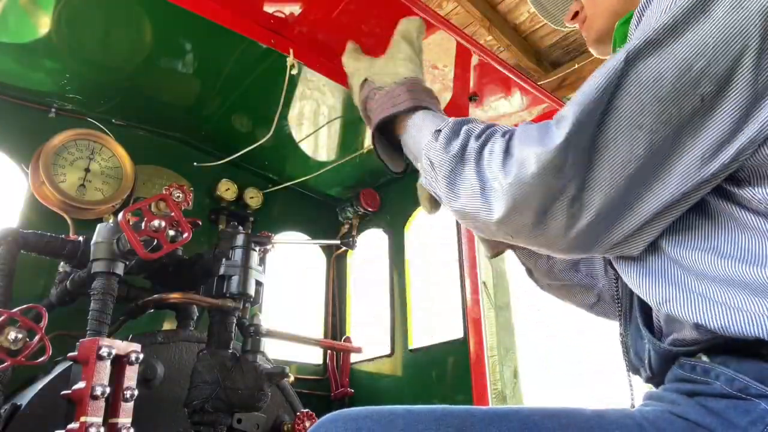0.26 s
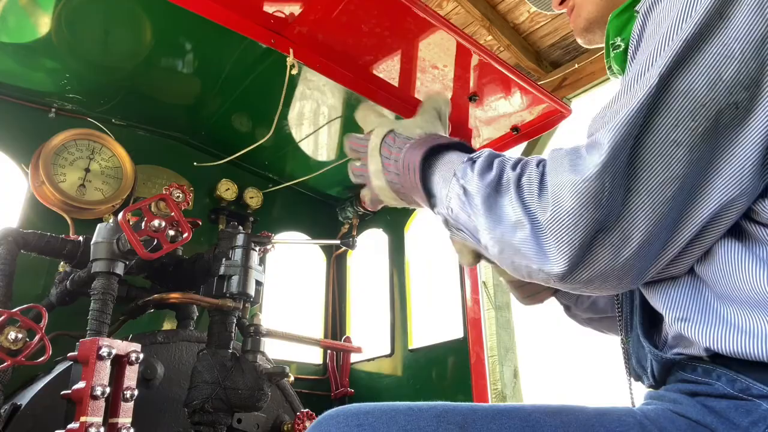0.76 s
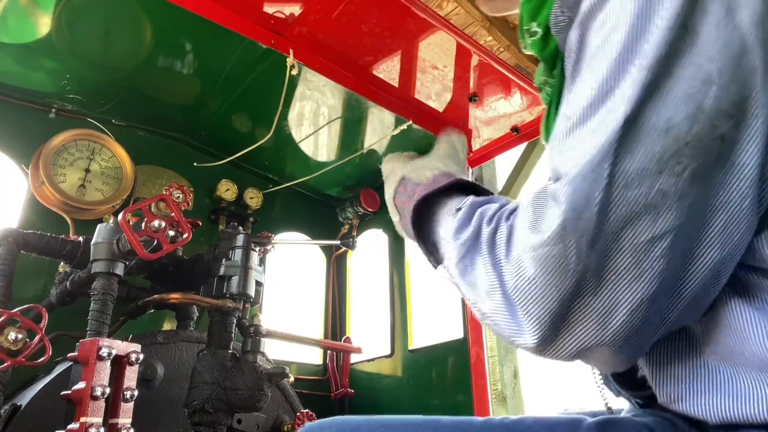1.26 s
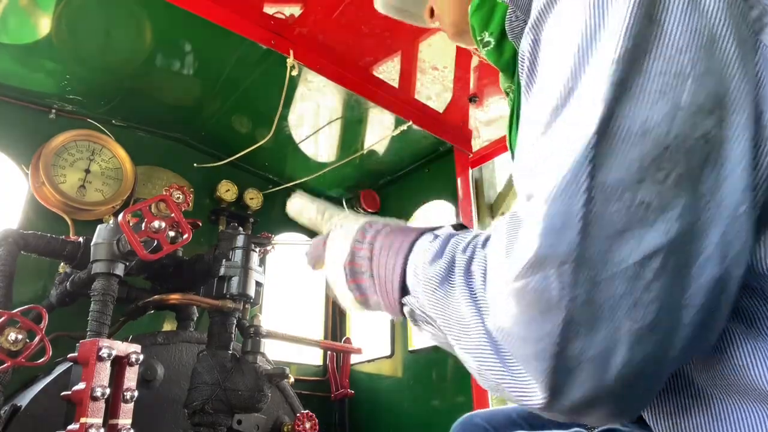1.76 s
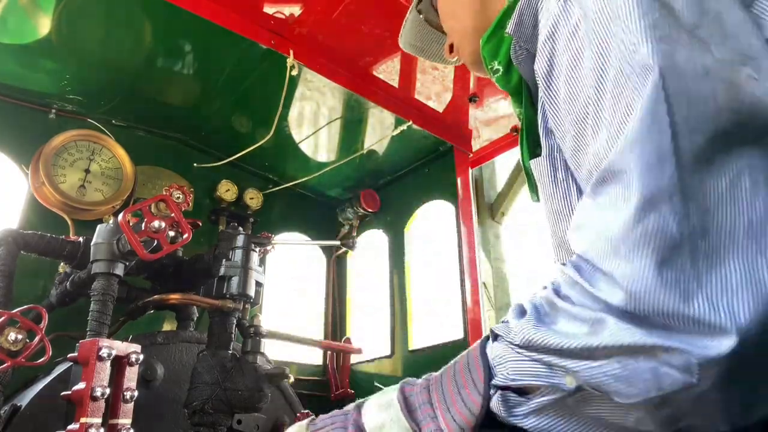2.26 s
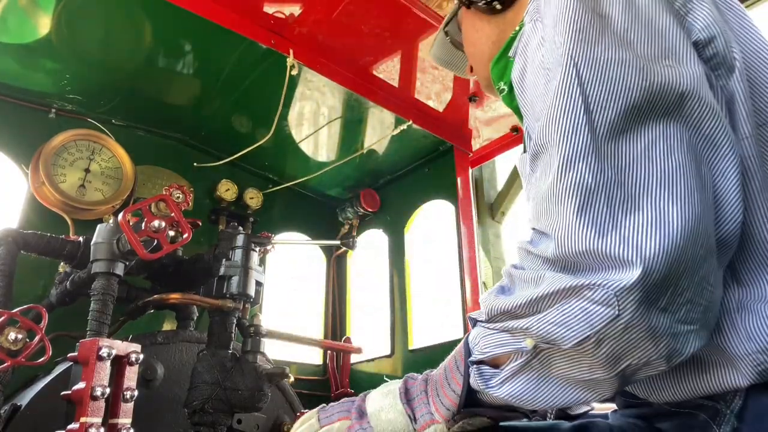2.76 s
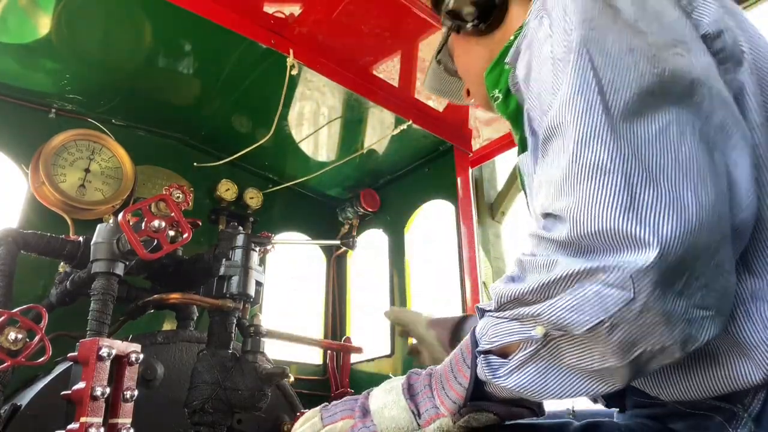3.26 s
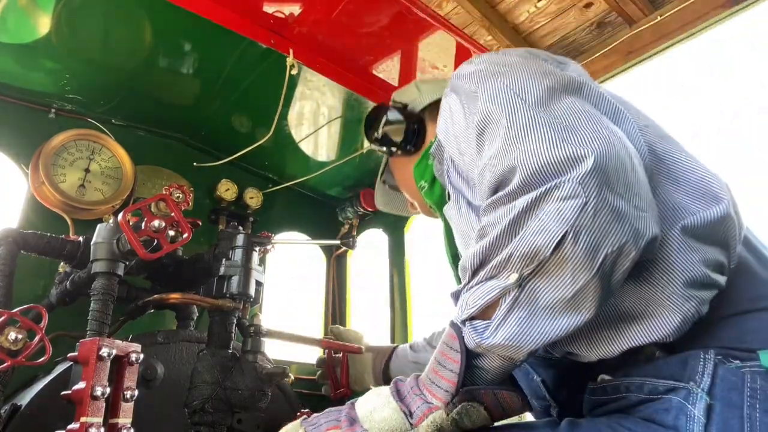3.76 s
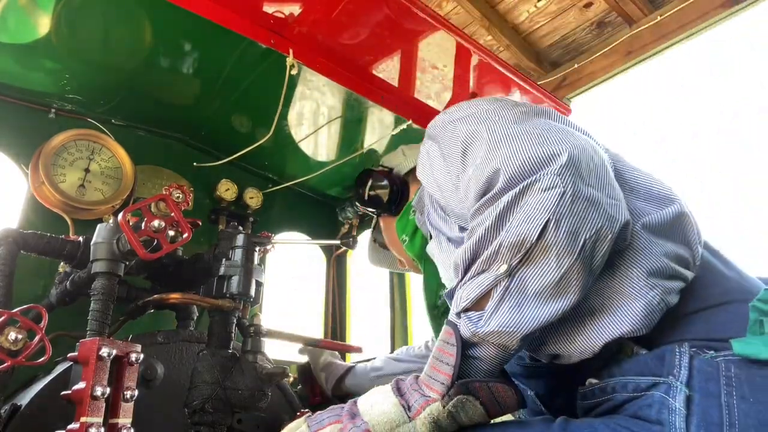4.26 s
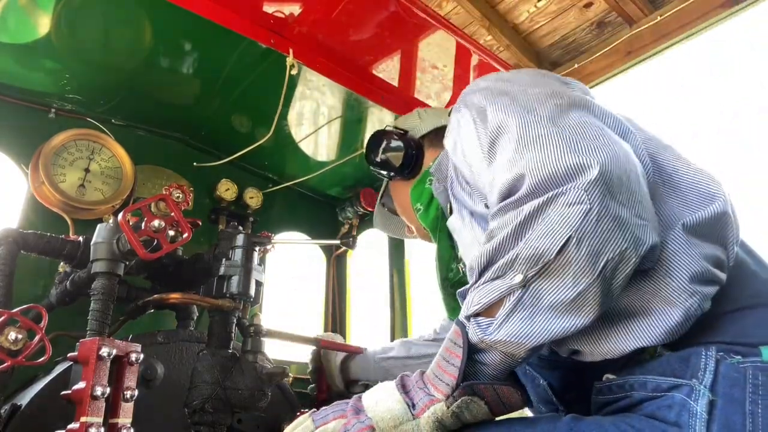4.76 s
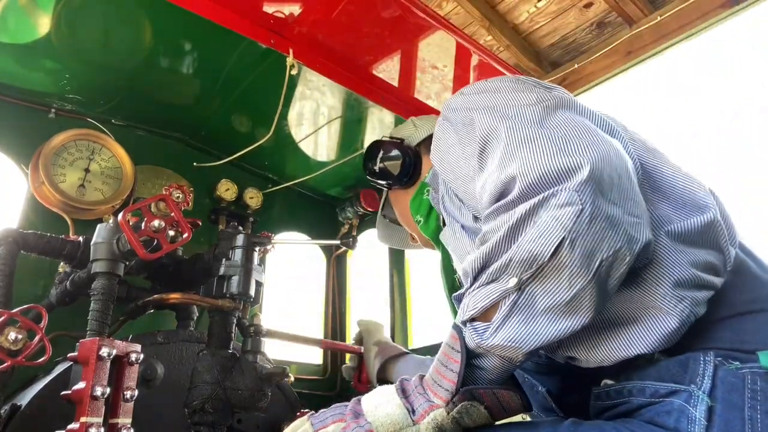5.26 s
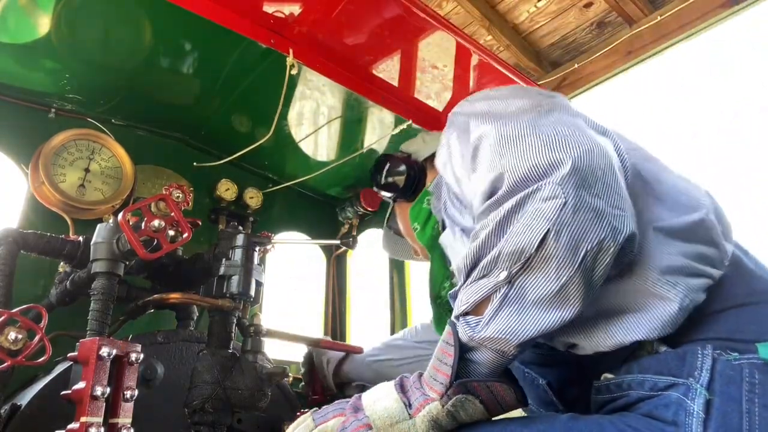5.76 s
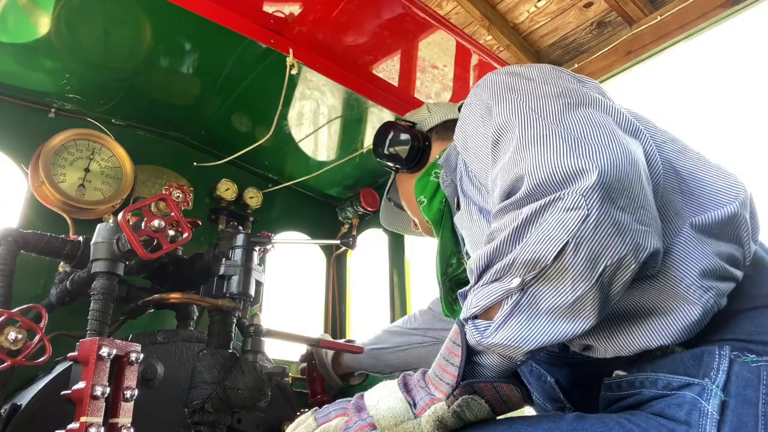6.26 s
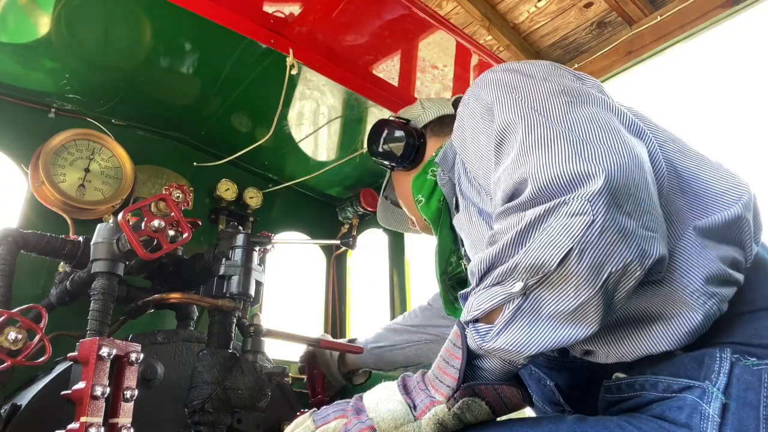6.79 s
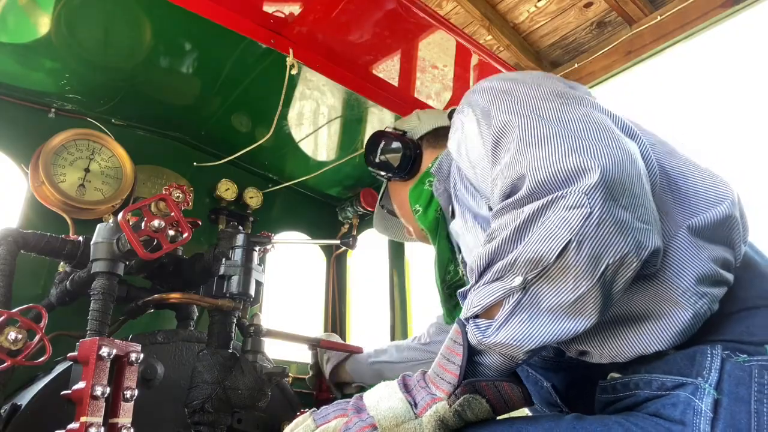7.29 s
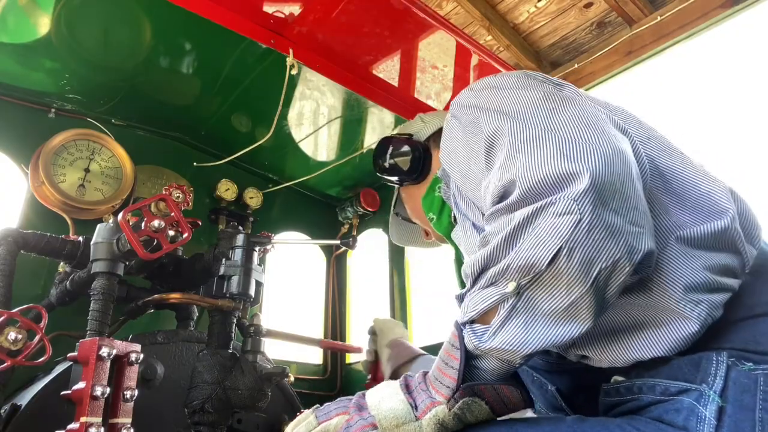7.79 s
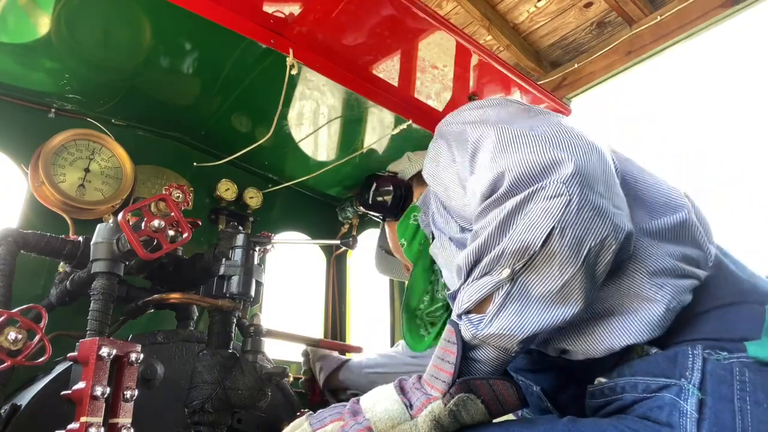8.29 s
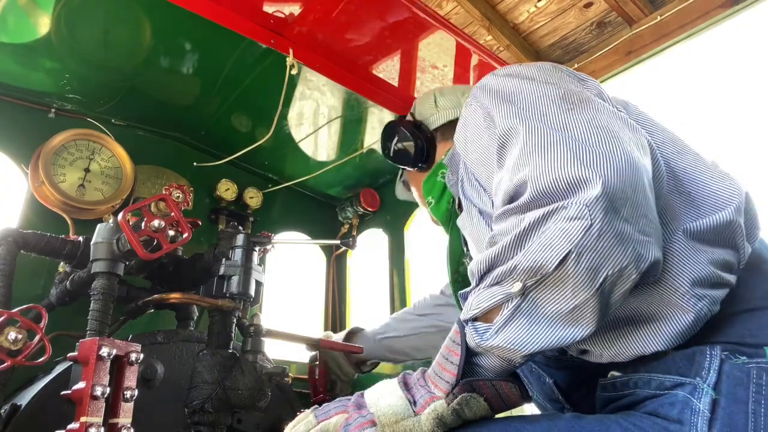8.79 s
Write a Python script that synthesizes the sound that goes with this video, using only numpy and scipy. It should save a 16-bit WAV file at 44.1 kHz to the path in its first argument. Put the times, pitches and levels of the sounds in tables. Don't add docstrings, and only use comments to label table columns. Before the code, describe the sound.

An oil fire roars and flutters in a small steam locomotive cab, with steady steam hiss and a few short metallic handle knocks.

```python
import sys
import numpy as np
from scipy import signal
from scipy.fft import rfft, irfft, next_fast_len
from scipy.io import wavfile
from scipy.ndimage import uniform_filter1d, map_coordinates

SR = 44100
rng = np.random.default_rng(int(sys.argv[2]) if len(sys.argv) > 2 else 0)


def field_ratio(decibels):
    return 10 ** (np.asarray(decibels, dtype=float) / 20)


def generate_wav(signal):
    frames = np.transpose(np.atleast_2d(signal))
    scaled = np.clip(frames, -1, 1) * 32767
    pcm = np.round(scaled).astype(np.int16)
    wavfile.write(sys.argv[1], SR, pcm)


N = 398663

# (pitch [Hz], width [Hz], left level [dB], right level [dB])
CAB_MODES = [(364.6, 85, -6, -2), (384.6, 30.6, 1, 3), (464.2, 25.5, -6, 4), (503.4, 14.2, 4, 11),
             (566.6, 28, -12, 0), (596, 290, -19.5, -14), (680, 25, -10.5, -13.5), (726, 35, -5.5, -8.5),
             (801, 45, -12, -2), (873.4, 29, -6.5, -16), (896, 67, -17, -13), (990, 49, -7.5, -9.5),
             (1067, 37, -10, -13), (1138, 35, -8.5, -8), (1223, 16.6, -7.5, -16), (1398, 96, -14, -18),
             (1546, 35, -12.5, -19), (1703, 112, -13, -21), (1837, 58, -15.5, -28),
             (1980, 105, -24.5, -21.5), (2142, 150, -19.5, -25.5), (2598, 100, -20.5, -24),
             (2734, 54, -14.5, -22.5), (3006, 620, -19.5, -24), (3390, 57, -18.5, -18.5),
             (3990, 23, -26.5, -24), (4340, 370, -27, -30.5), (4880, 37, -22.5, -38),
             (5625, 43, -25.5, -20), (5970, 110, -25, -35.5)]
PORT_PHASES = (0, -.1, -.4, .5, -1.1, 0, -1.8, -1.8, -2.1, 1.5, -3, -3, -2.3, -2.5, -2.6, -2, -2.5, -2.2,
               .7, .5, -1.7, -.2, -.7, -1.5, -2, -.4, -.1, 1.2, -1.6, -1)
# (pitch [Hz], width [Hz], level [dB], left minus right [dB])
PLATE_MODES = [(537, 210, 3, 0), (750, 78, 4, -10.5), (1160, 400, -7.5, 8), (1480, 220, -0.5, 4),
               (1810, 240, -0.5, 7.5), (2140, 200, -10, -10), (2670, 170, -9, -11.5), (3630, 340, -5.5, 5),
               (4640, 900, -15, 5), (6070, 550, -15.5, 4.5), (7240, 1400, -16, -2), (8850, 1600, -22, -2),
               (13300, 1900, -42, 10)]
# (time [s], peak [dB], thump [dB], brightness [dB per octave], top-octave level [dB])
KNOCKS = [(.851, -33, -14, 3, 8), (3.869, -29, -3, 2.5, -8), (4.264, -20.5, -9, 1, -10),
          (4.666, -26, -15, 5, 6), (4.965, -30, -6, 1, -10), (5.525, -27, 6, 2, 3), (5.559, -24, 1, 0, -15),
          (5.584, -24, 6.5, -0.5, -15), (5.6, -29.5, 8, -2, -15), (5.809, -19, -5, 3, 10),
          (7.796, -14.5, 2.5, 3, -5), (8.131, -24, -8, 5, -10), (8.142, -16, 6, 1, -2),
          (8.161, -19, 0.5, 1.5, -12), (8.178, -20, 4, -3, -12), (8.192, -28, 6, -3, -12),
          (8.41, -16, -5, 6.5, 20)]


def unit(x):
    return x / np.sqrt(np.mean(np.abs(x) ** 2) + 1e-20)


def along(points, hz):
    f, v = np.transpose(points)
    return np.interp(np.log(hz + 1), np.log(f + 1), v)


def curves(rows, t):
    s, *columns = np.transpose(rows)
    return [np.interp(t, s, column) for column in columns]


def wobble(rate):
    knots = rng.standard_normal(int(N * rate / SR) + 4)
    return map_coordinates(knots, [np.arange(N) * rate / SR])


def coloured(response, channels):
    m = next_fast_len(N)
    spectra = rfft(rng.standard_normal((channels, m)))
    shaped = response(np.fft.rfftfreq(m, 1 / SR), spectra)
    return unit(irfft(shaped, m)[..., :N])


def steam(lag_s=0.0002, in_step_hz=8300):
    # (time [s], level [dB])
    leak = [
        (0, -42.5),
        (4, -41.5),
        (6.3, -41),
        (7.6, -42),
        (9.04, -42.5),
    ]
    # (frequency [Hz], level [dB per Hz])
    hiss = [(500, -44), (700, 8.5), (1200, 10.5), (2400, 1.5), (3700, -1.5), (5200, -1.5), (6500, -1),
            (7900, 3.5), (9000, -4.5), (10300, -3), (12000, -7.5), (13500, -8.5), (15500, -12),
            (17000, -30)]
    # (frequency [Hz], share [0-1])
    direct = [(5000, 0.16), (6500, 0.15), (7500, .8), (9000, 0.64), (16000, 1)]

    def ports(hz, z):
        share = np.clip(along(direct, hz), 0, 1)
        late = np.exp(-2j * np.pi * (hz - in_step_hz) * lag_s)
        right = share * late * z[0] + np.sqrt(1 - share ** 2) * z[1]
        return np.array([z[0], right]) * field_ratio(along(hiss, hz))

    level_db, = curves(leak, np.arange(N) / SR)
    unsteady_db = 0.28 * wobble(3.9) + 0.59 * wobble(25)
    return field_ratio(level_db + 6.0 + unsteady_db) * coloured(ports, channels=2)


def cab():
    # (frequency [Hz], share [0-1])
    alike = [(400, 1), (470, 1), (520, 0.8), (600, 0.13), (720, 0.76), (1500, 0.77), (2700, 1),
             (3300, 0.61), (6000, 0.12)]
    # (time [s], turned to the fire [0-1], bent over it [0-2])
    posture = [
        (0, 0.2, 0),
        (1.17, 0, 0.56),
        (1.36, 1, 0),
        (2.8, 0.47, 0.36),
        (3.5, 1, 0.32),
        (4.3, 0.86, 0.54),
        (6.6, 0.75, 0.79),
        (7.5, 0.8, 0.38),
        (7.7, 0.89, 0.88),
        (9.04, 0.62, 1.6),
    ]
    # (pitch [Hz], turning: left [dB], right [dB],
    # bending: left [dB], right [dB])
    shade = [
        (384, 12, 8.5, 0.5, 2),
        (502, 3, 0, -2.5, -4.5),
        (810, 0, -1, 2, -1),
        (612, 18, 8, 5, 6),
        (350, 3, 1, -1, -2),
    ]
    frame, hop = 4096, 1024
    hz, t, z = signal.stft(rng.standard_normal((2, N)), SR, nperseg=frame, noverlap=frame - hop)
    centre, width, left_db, right_db = np.transpose(CAB_MODES)
    shape = 1 / (1 + (2 * (hz[:, None] - centre) / (0.98 * width)) ** 2) ** 1.75

    turned, bent = [c - np.mean(c) for c in curves(posture, t)]
    noise = rng.standard_normal((len(CAB_MODES), len(t)))
    drift_db = 1.02 * uniform_filter1d(noise, size=9, axis=1) * 3
    left, right = drift_db.copy(), drift_db.copy()
    for shaded_hz, turn_left_db, turn_right_db, bend_left_db, bend_right_db in shade:
        k = np.argmin(np.abs(centre - shaded_hz))
        left[k] += turn_left_db * turned + bend_left_db * bent
        right[k] += turn_right_db * turned + bend_right_db * bent
    left, right = field_ratio(left + left_db[:, None]), field_ratio(right + right_db[:, None])

    likeness = np.clip(along(alike, centre), 0, 1) * np.exp(1j * np.array(PORT_PHASES))
    shared = likeness[:, None] * left * right
    power_l, power_r, cross = shape @ left ** 2, shape @ right ** 2, shape @ shared
    follows = cross / np.sqrt(power_l)
    own = np.sqrt(np.abs(power_r - np.abs(follows) ** 2))
    pair = np.array([np.sqrt(power_l) * z[0], follows * z[0] + own * z[1]])
    sound = signal.istft(pair, nperseg=frame, noverlap=frame - hop)[1]
    return field_ratio(-20) * unit(sound[:, :N])


def flame_db():
    # (time [s], level [dB])
    burning = [
        (0.0, -15.5),
        (0.43, -19.5),
        (0.65, -17.5),
        (3.32, -19.5),
        (4.25, -22),
        (4.58, -18),
        (6.62, -19.5),
        (6.87, -21),
        (8.63, -18.5),
        (9.04, -17),
    ]
    # (start [s], length [s], level [dB])
    surges = [(0.116, 0.032, -11), (0.28, 0.041, -8), (0.4, 0.14, -14), (0.543, 0.057, -12),
              (0.662, 0.052, -10), (0.89, 0.032, -10.5), (0.96, 0.024, -9), (1.12, 0.02, -10),
              (1.75, 0.03, -8), (1.811, 0.055, -15), (1.887, 0.029, -17), (2.27, 0.018, -10),
              (2.981, 0.057, -10), (3.226, 0.061, -12.5), (3.354, 0.029, -11), (3.454, 0.063, -10),
              (3.865, 0.118, -8), (4.23, 0.029, -11.5), (4.6, 0.077, -11), (4.744, 0.029, -20),
              (5.134, 0.047, -16), (5.435, 0.044, -14), (5.56, 0.05, -12), (6.128, 0.055, -17),
              (6.267, 0.037, -10.5), (6.317, 0.029, -16), (6.393, 0.099, -9.5), (6.59, 0.029, -9),
              (6.855, 0.039, -6.5), (8.668, 0.051, -9.5)]
    # (time [s], loss [dB])
    chokes = [(.06, 15), (.63, 12), (.81, 11), (2.1, 13), (3.69, 10), (4.05, 3), (4.33, 12), (6.0, 14),
              (7.1, 13), (7.61, 8), (8.35, 7)]
    choke_s, surge_edge_s = 0.018, 0.0093
    bed_db, surge_over_db = 2.5, -3.5
    puffs_per_s, puff_db = 11, 3

    t = np.arange(N) / SR
    starved_db = sum(loss_db * np.exp(-((t - s) / choke_s) ** 2) for s, loss_db in chokes)
    bed = curves(burning, t)[0] + bed_db + puff_db * wobble(puffs_per_s)
    power = field_ratio(bed - starved_db) ** 2
    for s, length, db in surges:
        outside = np.clip(np.abs(t - s - length / 2) - length / 2, 0, None)
        power += field_ratio(db + surge_over_db) ** 2 * np.exp(-(outside / surge_edge_s) ** 2)
    return 10 * np.log10(power)


def fire():
    # (frequency [Hz], level [dB per Hz])
    roar = [(15, -36), (25, -30), (39, -25), (50, -10), (62, 1.5), (75, 0), (92, -2.5), (105, -7.5),
            (118, -17.5), (150, -37), (300, -120)]
    # (frequency [Hz], level [dB per Hz])
    flutter_colour = [(80, -45), (108, -0.5), (120, 4.5), (140, 9.5), (160, -2.5), (190, -6.5), (207, 0),
                      (236, 4), (260, 1.5), (290, 4.5), (315, -2), (335, -9), (420, -45)]

    def apart_response(hz, z):
        return z[0] * np.hypot(field_ratio(along(roar, hz)), field_ratio(along(flutter_colour, hz) - 14))

    roar_db = flame_db()
    boom = coloured(lambda hz, z: z[0] * field_ratio(along(roar, hz)), channels=1)
    smooth = uniform_filter1d(uniform_filter1d(boom ** 2, size=2600), size=2600)
    swell = np.abs(smooth) + .02
    boom = unit(boom / swell ** 0.25)
    flutter = coloured(lambda hz, z: z[0] * field_ratio(along(flutter_colour, hz)), channels=1)
    both = field_ratio(roar_db) * boom + field_ratio(-25.5 + 1.3 * wobble(2.73)) * flutter
    apart = coloured(apart_response, channels=1)
    return both * field_ratio([[-.25], [.25]]) + field_ratio(-41.0) * apart * [[1], [-1]]


def singing():
    # (time [s], pitch [Hz], level [dB], time to fall 60 dB [s])
    sings = [(4.2641, 4300, -33, .05), (4.6661, 5600, -34, .04), (5.5561, 680, -19, .12),
             (5.5591, 1960, -25, .07), (5.5851, 800, -21, .12), (5.8091, 3700, -27, .05),
             (5.8101, 4200, -26, .05), (7.7966, 560, -12, .045), (7.7961, 2010, -13, .12),
             (7.7981, 710, -17, .05), (7.7971, 1760, -14, .08), (8.1426, 700, -14, .06),
             (8.1431, 1900, -16, .1), (8.1456, 540, -14, .08), (8.1461, 1550, -19, .12),
             (8.1601, 780, -17, .07), (8.4121, 6800, -26, .045), (8.4131, 1720, -14, .13),
             (8.4141, 1140, -20, .1), (8.4161, 727, -13, .16)]
    spread, waver_depth = .65, .008
    out, t = np.zeros((2, N + SR)), np.arange(SR // 4) / SR
    side = np.array([[.5], [-.5]])
    tilts = [(c, pan) for c, _, _, pan in PLATE_MODES]
    turns = [(row[0], turn) for row, turn in zip(CAB_MODES, PORT_PHASES)]
    for s, hz, db, t60 in sings:
        level_db = db + 1.5 + side * spread * along(tilts, hz)
        fade = field_ratio(level_db - 60 * t / t60) * (1 - np.exp(-t / 0.0013))
        waver = map_coordinates(rng.standard_normal(64), [t * 200])
        cycles = np.cumsum(hz * (1 + waver_depth * waver)) / SR
        phase = np.array([[0], [along(turns, hz)]])
        out[:, round(s * SR):][:, :len(t)] += fade * np.sin(2 * np.pi * cycles + phase)
    return out[:, :N]


def resonance(hz, centre_hz, width_hz):
    return 1j * hz * width_hz / (centre_hz ** 2 - hz ** 2 + 1j * hz * width_hz)


def handle():
    chatter_s, longer_s_per_thump_db, longer_s_per_peak_db = 0.12, 0.0019, 0.0047
    out, t = np.zeros((2, N + SR)), np.arange(SR // 2) / SR
    half = len(t) // 2
    hz, side = np.fft.rfftfreq(len(t), 1 / SR), np.array([[.5], [-.5]])
    treble = 1 / (1 + (3200 / (hz + 1)) ** 4)
    for s, db, thump_db, bright_db, top_db in KNOCKS:
        t60 = chatter_s + longer_s_per_thump_db * thump_db + longer_s_per_peak_db * (db + 18.5)
        t60 = max(t60, .03)
        plate = 0
        for k, (c, width, level, pan) in enumerate(PLATE_MODES):
            if c < 900:
                tilt_db = thump_db
            elif c > 9500:
                tilt_db = top_db
            else:
                tilt_db = bright_db * np.log2(c / 1800)
            plate = plate + (-1) ** k * field_ratio(level + tilt_db + side * pan) * resonance(hz, c, width)
        plate = np.where(hz > 10000, plate * field_ratio(0.4 * top_db), plate)
        noise = rng.standard_normal((2, 2, len(t))) * (1 - np.exp(-t / 0.0012))
        slow = rfft(noise[0] * field_ratio(-60 * t / t60)) * (1 - treble)
        fast = rfft(noise[1] * field_ratio(-60 * t / (0.62 * t60))) * treble
        knock = irfft((slow + fast) * plate, len(t))
        out[:, round(s * SR):][:, :half] += field_ratio(db + 16.5) * knock[:, :half]
    return out[:, :N]


def ducking():
    over_db, ratio, delay_s, recover_s = -16.5, 1.26, 0.049, 0.34
    t = np.arange(N) / SR
    dips = []
    for s, db, *_ in KNOCKS:
        since = np.clip(t - s, 0, None)
        onset = 1 - np.exp(-(since / delay_s) ** 2)
        dips.append(max(db - over_db, 0) * onset * np.exp(-since / recover_s))
    return field_ratio(-ratio * np.max(dips, axis=0))


def scene():
    return steam() + cab() + fire() + singing() + handle()


def band_limit(x):
    return signal.sosfilt(signal.butter(12, 15850, fs=SR, output="sos"), x)


def record(dry):
    # (from [Hz], to [Hz], loss of the sum [dB])
    weak_sum = [(9650, 11050, -14), (13800, 14600, -7.5), (14600, 17000, -10)]
    # (from [Hz], to [Hz], loss of the difference [dB])
    weak_difference = [(7600, 8950, -8.5), (12400, 13800, -13), (13800, 14500, -5)]
    dry = dry * ducking()
    soft = dry / (1 + np.abs(dry / 1.05) ** 6) ** (1 / 6)
    hz = np.fft.rfftfreq(N + 1, 1 / SR)
    pair = rfft([soft[0] + soft[1], soft[0] - soft[1]], N + 1) / 2
    for k, bands in enumerate((weak_sum, weak_difference)):
        for low, high, loss_db in bands:
            pair[k, (hz > low) & (hz < high)] *= field_ratio(loss_db)
    mid, side = irfft(pair, N + 1)[:, :N]
    return band_limit(np.array([mid + side, mid - side]))


dry = scene()
out = record(dry)
generate_wav(out)
```